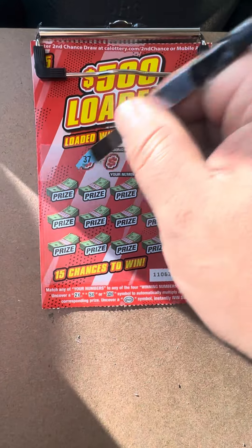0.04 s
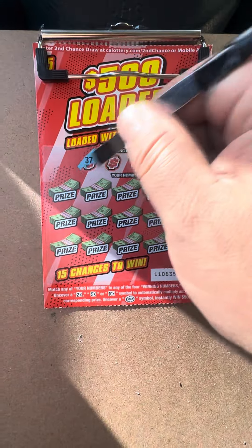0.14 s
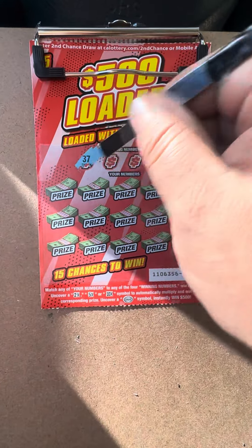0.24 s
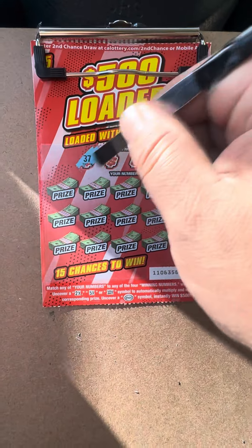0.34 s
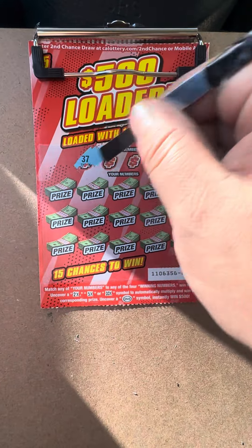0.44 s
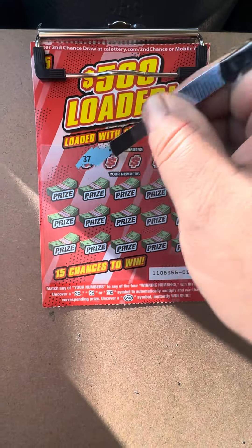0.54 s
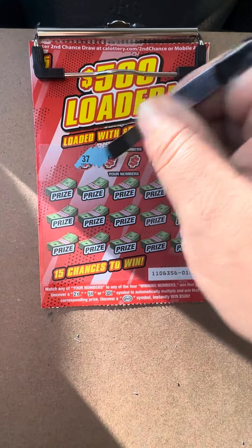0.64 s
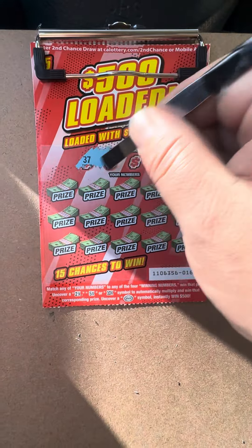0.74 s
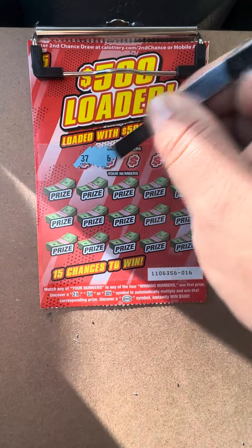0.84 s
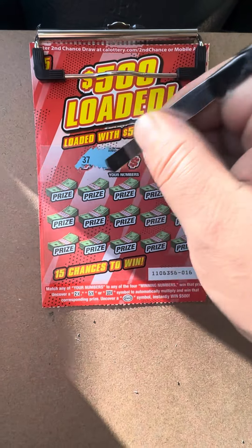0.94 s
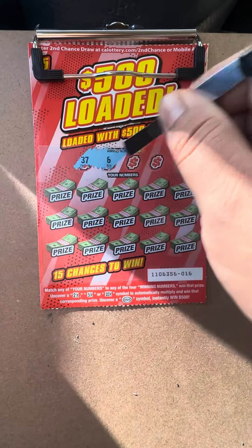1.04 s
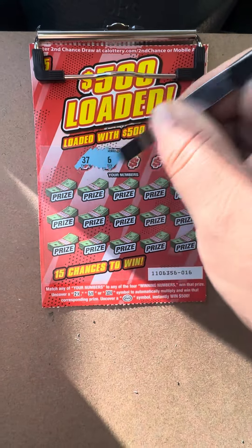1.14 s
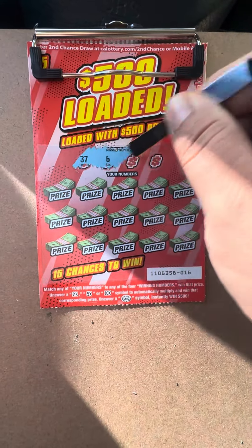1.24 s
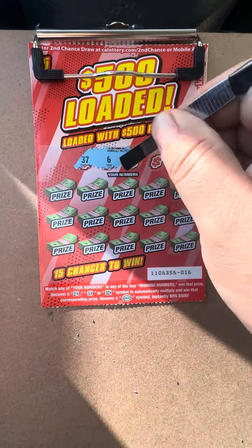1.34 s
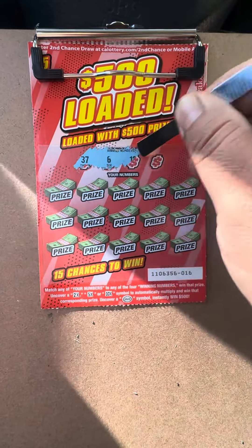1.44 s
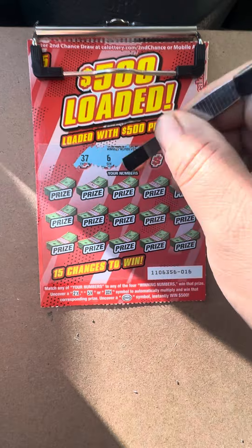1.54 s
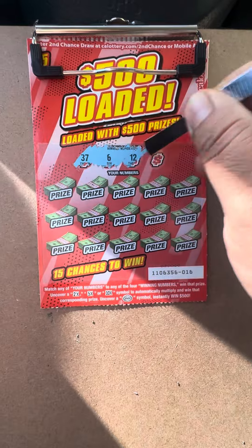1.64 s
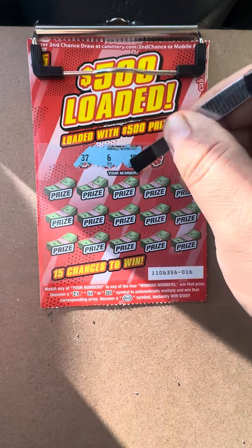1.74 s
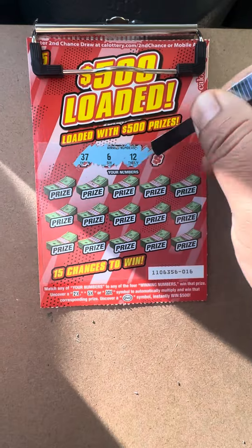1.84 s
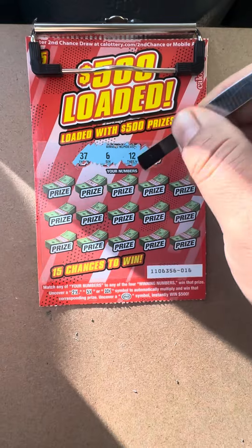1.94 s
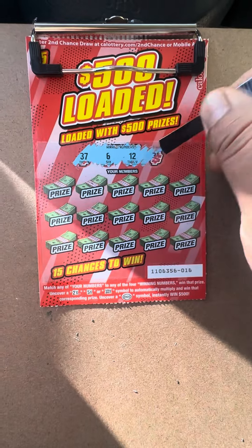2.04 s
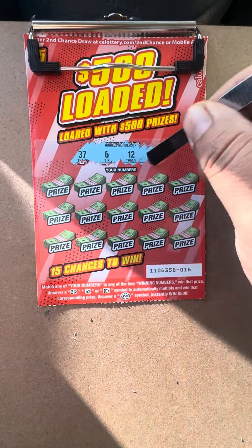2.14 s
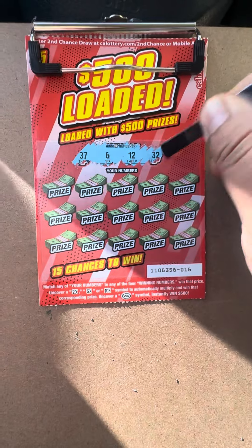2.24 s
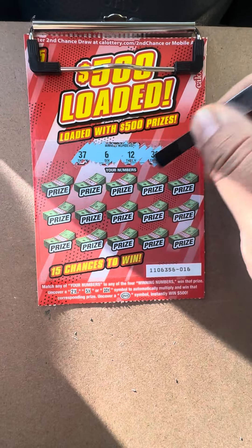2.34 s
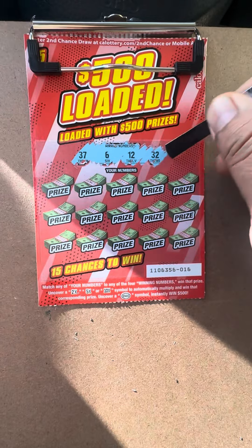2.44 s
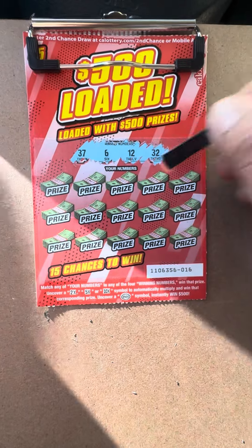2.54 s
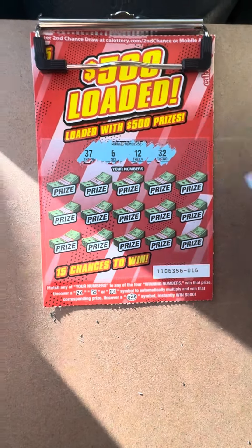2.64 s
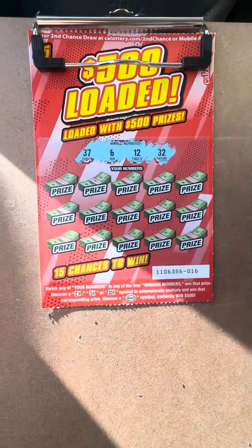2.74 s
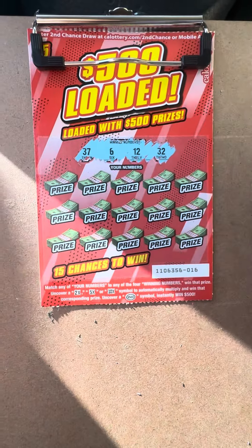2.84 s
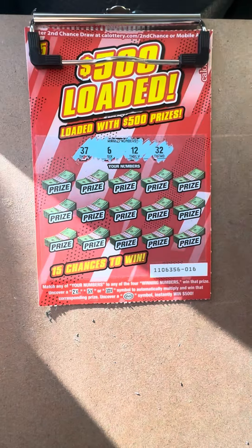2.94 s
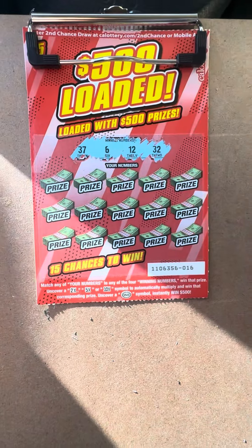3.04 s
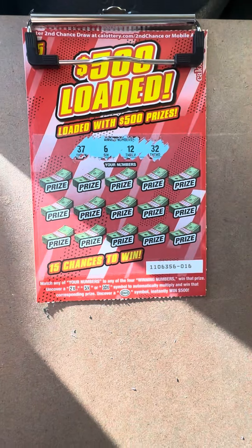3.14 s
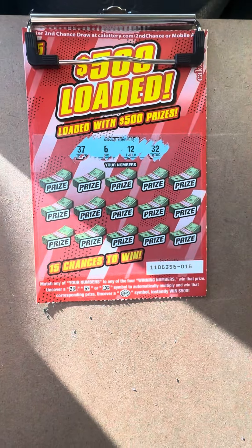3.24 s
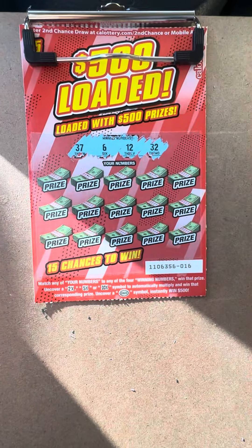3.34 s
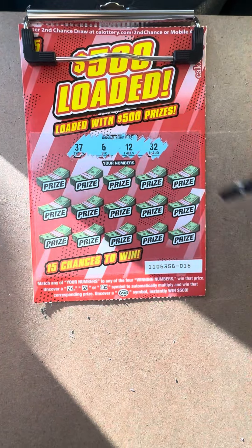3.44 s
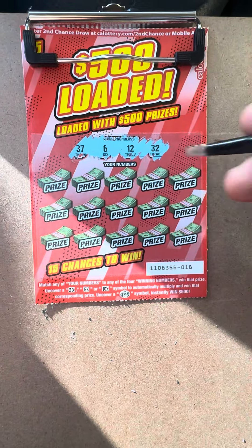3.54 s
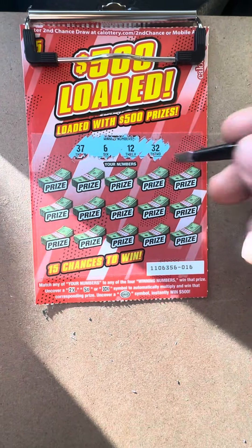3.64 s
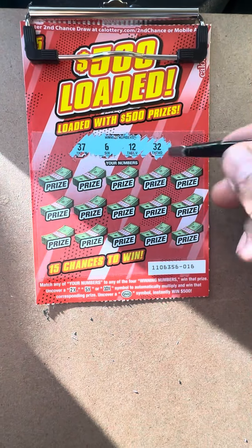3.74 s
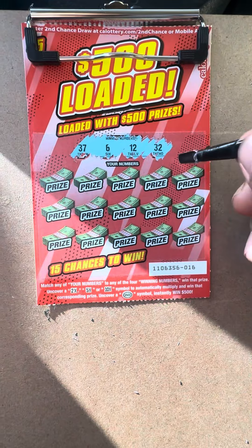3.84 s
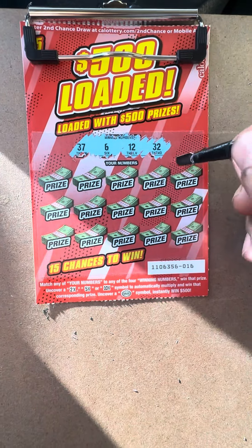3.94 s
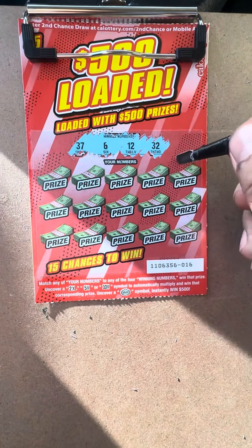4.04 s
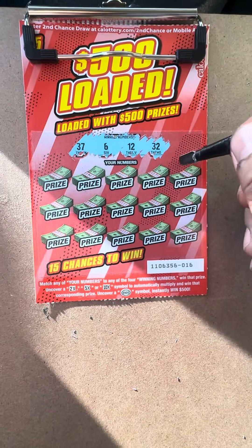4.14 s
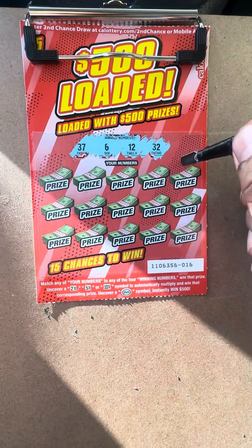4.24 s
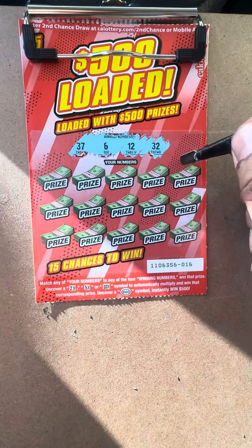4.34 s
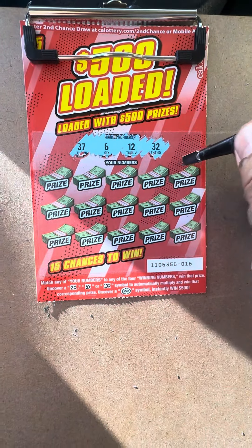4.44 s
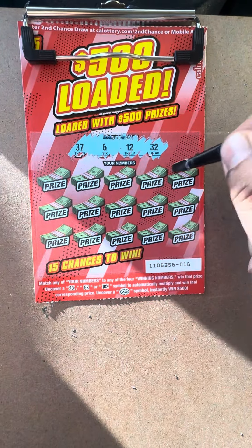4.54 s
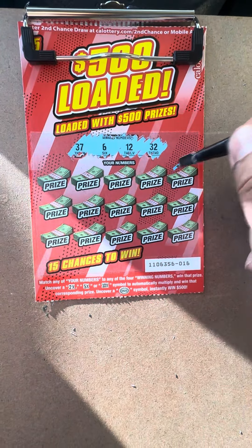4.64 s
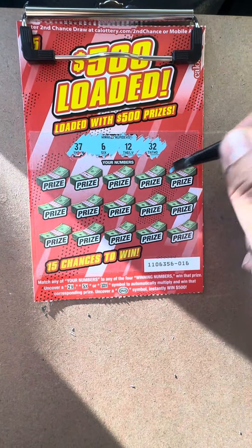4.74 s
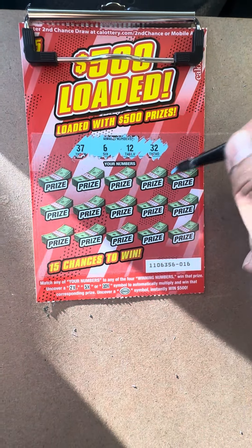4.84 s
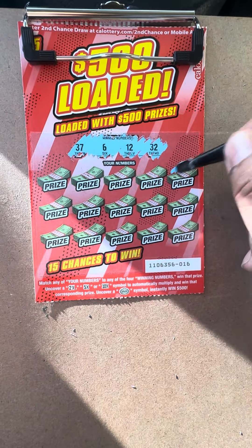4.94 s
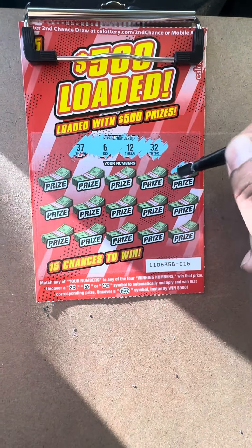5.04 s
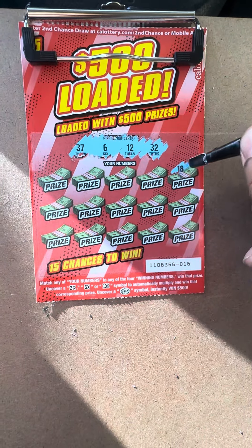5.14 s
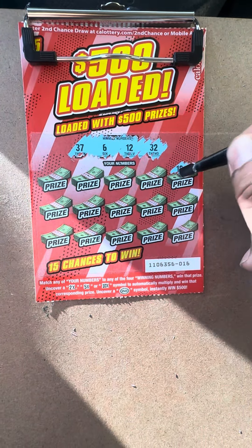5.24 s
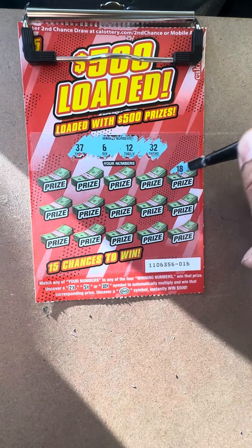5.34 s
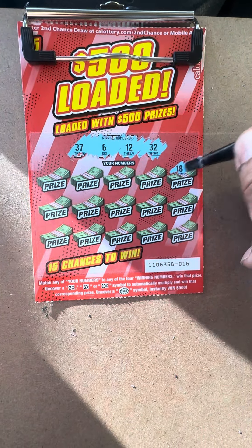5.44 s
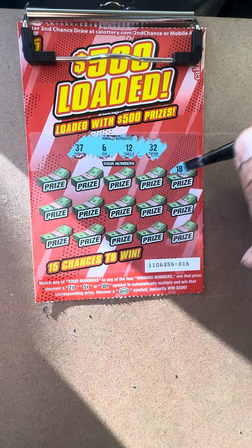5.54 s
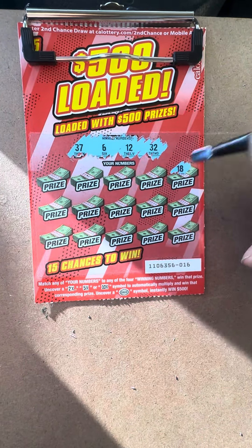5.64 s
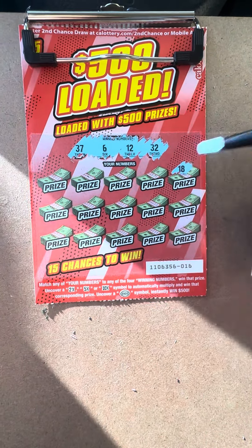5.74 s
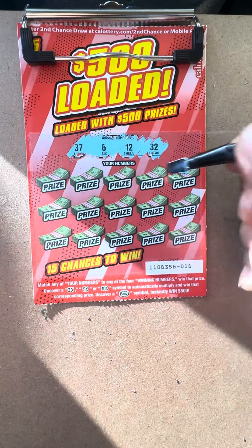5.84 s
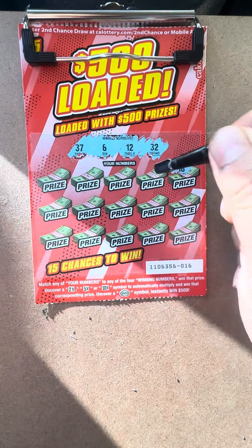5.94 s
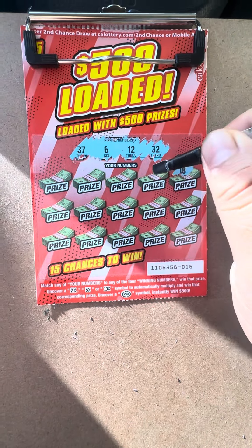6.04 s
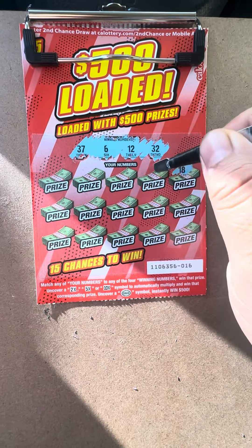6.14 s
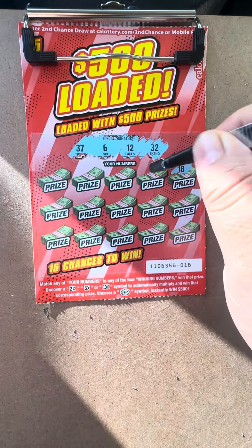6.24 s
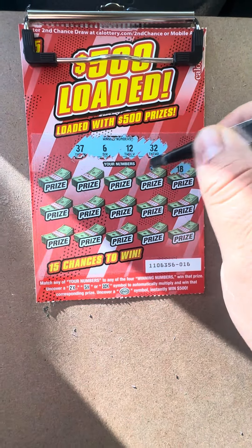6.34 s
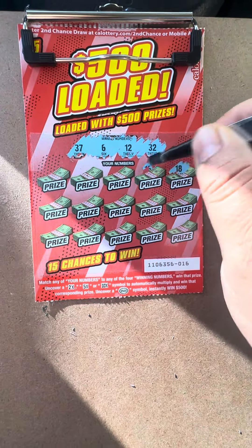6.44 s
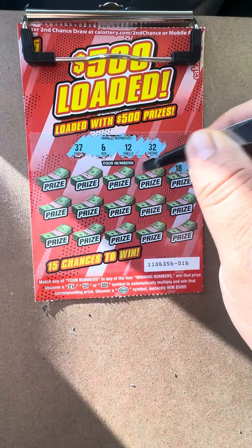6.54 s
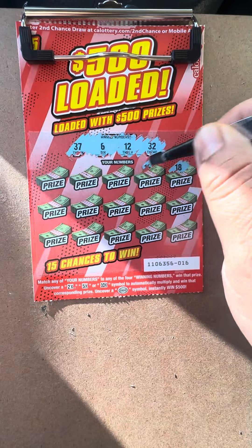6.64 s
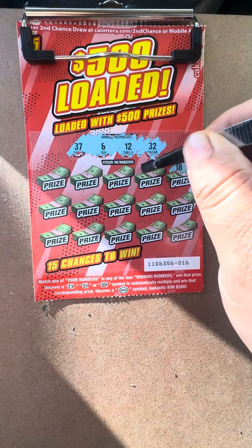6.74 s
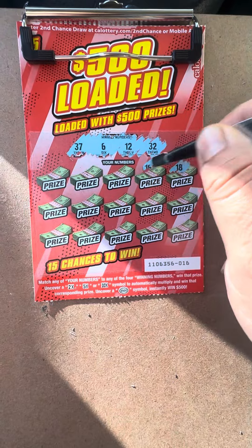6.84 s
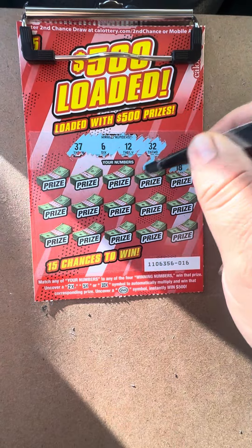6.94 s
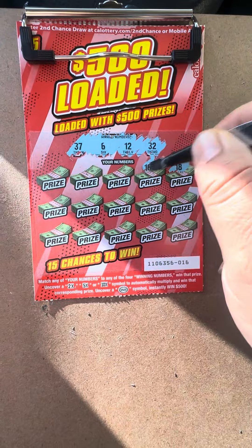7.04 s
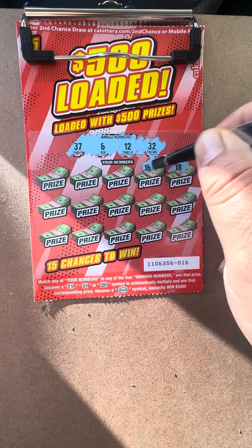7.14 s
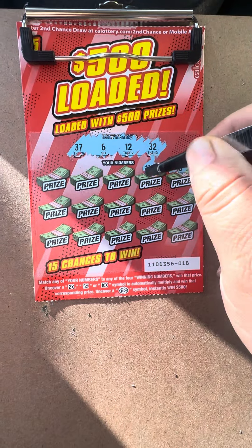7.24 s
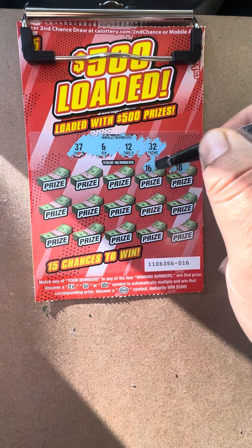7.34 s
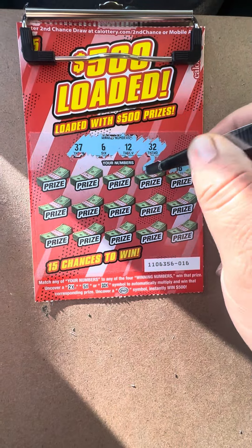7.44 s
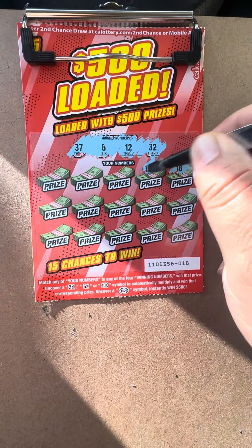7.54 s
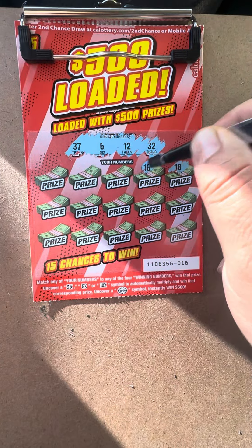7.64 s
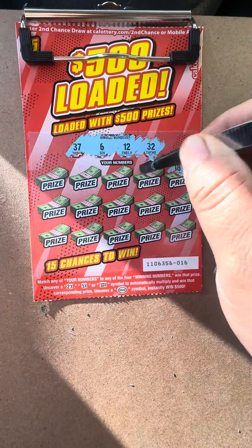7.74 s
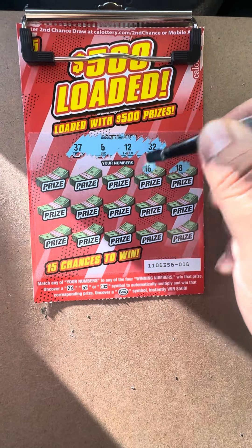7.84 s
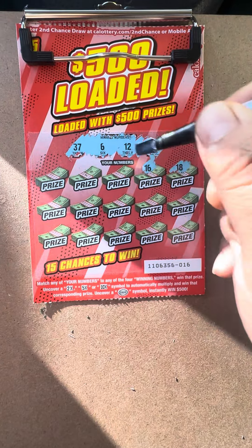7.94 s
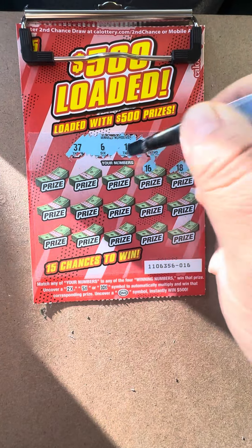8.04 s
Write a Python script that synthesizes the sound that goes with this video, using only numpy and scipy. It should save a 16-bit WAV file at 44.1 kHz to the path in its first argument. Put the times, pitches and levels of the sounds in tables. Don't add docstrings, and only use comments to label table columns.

```python
import sys
import numpy as np
from scipy import signal
from scipy.fft import rfft, irfft, next_fast_len
from scipy.io import wavfile
from scipy.ndimage import uniform_filter1d

SR = 44100
rng = np.random.default_rng(int(sys.argv[2]) if len(sys.argv) > 2 else 0)


def undo_db(level):
    steps = np.asarray(level, float) / 20
    return 10 ** steps


def wav_out(sig):
    wavfile.write(sys.argv[1], SR, np.round(np.clip(np.atleast_2d(sig).T, -1, 1) * 32767).astype(np.int16))


N = 356328


def rms_one(x):
    return x / np.sqrt(np.mean(x ** 2) + 1e-20)


def held(slow):
    return np.repeat(slow, 20, axis=-1)[..., :N]


def drift(rate_hz):
    r = np.exp(-40 * np.pi * rate_hz / SR)
    noise = rng.standard_normal(N // 20 + 2001)
    return rms_one(signal.lfilter([1], [1, -2 * r, r * r], noise)[2000:])


def coloured(spectrum, likeness):
    log_hz = np.log(np.fft.rfftfreq(N, 1 / SR) + 1)
    spectrum_hz, spectrum_db = np.transpose(spectrum)
    alike_hz, alike = np.transpose(likeness)
    level_db = np.interp(log_hz, np.log(spectrum_hz + 1), spectrum_db)
    alike = np.clip(np.interp(log_hz, np.log(alike_hz + 1), alike), -1, 1)
    mid, side = rfft(rng.standard_normal((2, N)))
    both = np.sqrt(1 + alike) * mid + np.sqrt(1 - alike) * side * np.array([[1], [-1]])
    return rms_one(irfft(undo_db(level_db) * both, N))


def swells(starts_s, lengths_s, levels_db, leans_db, sharp, early=1):
    out = np.zeros(N)
    for start_s, length_s, level_db, lean_db in zip(starts_s, lengths_s, levels_db, leans_db):
        i = round(start_s * SR)
        way = np.linspace(0, 1, max(round(length_s * SR), 2))
        arch = np.sin(np.pi * way ** early).clip(0) ** sharp
        out[i:i + len(way)] += arch * undo_db(level_db + lean_db * (way - .5))
    return out


# hz, level_db (per Hz)
ROOM = [(300, -35.5), (500, 4), (750, -1), (1300, -12), (1900, -3), (2500, -12), (3800, -13), (4500, -16),
        (5200, -16.5), (5950, -8), (6800, -17.5), (9000, -29), (10000, -37), (15000, -53)]
# hz, likeness of left and right (-1 to 1)
ROOM_LIKENESS = [(60, 0.46), (180, 0.31), (550, -1.9), (1650, 0.54), (4970, 0.64), (15000, -0.55)]


def room_tone():
    return undo_db(-73.5) * coloured(ROOM, ROOM_LIKENESS)


# time_s, level_db
ARM = [(0.0, -46.5), (0.04, -45), (0.29, -39), (0.47, -50.5), (0.49, -48.5), (2.43, -49), (2.62, -58.5),
       (3.67, -53.5), (4.07, -54), (4.66, -56), (4.7, -45.5), (4.77, -46), (5.87, -63.5), (6.8, -50),
       (7.74, -54.5), (8.08, -64)]


def rumble():
    hum_db, hum_wander_db = -56.5, -0.5
    far_drone_db, far_fade_db_per_s = -51.5, 2.5
    work_drone_db, work_ease_s = -52.5, 0.12
    t = np.arange(N) / SR
    working = np.zeros(N)
    for bout, lift_s in zip((FIRST_BOUT, SECOND_BOUT, THIRD_BOUT), TIP_LIFTS_S):
        inside_s = np.minimum(t - bout[0][0], lift_s - t)
        working += np.clip(inside_s / work_ease_s + .5, 0, 1)
    deep = coloured([(15, -34), (28, -6), (44, 9.5), (62, 6.5), (80, -16.0), (130, -65.5)],
                    [(20, 0.88), (200, 0.96)])
    hum = coloured([(50, -15.0), (70, -3), (92, 1.0), (105, -8.0), (125, -20.5), (200, -74.5)],
                   [(20, 0.5), (200, 0.83)])
    drone = coloured([(100, -36.5), (135, 6.5), (175, -0.5), (260, -5.0), (370, -13.5), (480, -16),
                      (700, -46.5)], [(150, 0.83), (500, 0.18)])
    far = undo_db(far_drone_db - far_fade_db_per_s * t) * (1 - working)
    droning = far + undo_db(work_drone_db) * working
    humming = held(undo_db(hum_db + hum_wander_db * drift(1.8)))
    return undo_db(np.interp(t, *np.transpose(ARM))) * deep + humming * hum + droning * drone


# start_s, length_s, skin_hiss_db, lean_db, dull_board_db
BRUSHES = [(2.505, 0.055, -64.5, 3, -61), (2.555, 0.069, -55.5, 4, -68), (2.825, 0.051, -62.5, -2, -89),
           (2.875, 0.028, -61, 5, -97), (2.994, 0.056, -74, -7, -73), (3.097, 0.03, -72, -2, -75),
           (3.246, 0.028, -69, -8, -81), (3.279, 0.017, -61.5, 11, -89), (3.306, 0.032, -71, -4, -87),
           (3.65, 0.17, -77, -7, -62), (4.075, 0.13, -96, 3, -62.5), (5.565, 0.068, -86, -20, -66),
           (5.636, 0.019, -66, -9, -62), (5.685, 0.16, -65, -25, -81), (5.89, 0.083, -70, 12, -80),
           (7.772, 0.065, -81, -15.5, -58.5), (7.829, 0.072, -68, 14, -74)]
# hz, level_db (per Hz)
SKIN = [(1000, -18), (2400, -11), (3500, -16), (6500, -9.5), (9000, -11), (11000, -20), (13000, -7),
        (15300, -11), (17000, -20)]


def brushing():
    start_s, length_s, hiss_db, lean_db, _ = np.transpose(BRUSHES)
    hiss = coloured(SKIN, [(1000, 0.29), (7000, 0.4), (15000, -0.71)])
    rubs = swells(start_s, length_s, hiss_db, lean_db, sharp=0.47, early=0.83)
    return rubs * held(undo_db(2.5 * drift(150))) * hiss


def struck(times_s, levels_db, modes, contact_s, ring_share, spread_s):
    out = np.zeros(N)
    push = np.hanning(round(contact_s * SR) + 3)
    for hz, mode_db, t60_s in modes:
        clicks = np.full(N, 1e-18)
        at = np.round((times_s + spread_s * np.sqrt(100 / hz)) * SR).astype(int)
        clicks[at] = undo_db(levels_db + mode_db + rng.normal(0, 1.5, len(at)))
        r = undo_db(-60 / (ring_share * t60_s * SR))
        w = 2 * np.pi * hz / SR
        out += signal.lfilter([0, np.sin(w)], [1, -2 * r * np.cos(w), r * r], clicks)
    return signal.lfilter(push / push.sum(), [1], out)


# time_s, tick_db, thud_db
TAPS = [(2.506, -50, -51), (2.584, -49, -58), (3.249, -54, -83), (3.298, -39, -87), (3.544, -58, -65.5),
        (3.596, -75, -53.5), (3.6085, -23, -12.5), (3.982, -34, -53), (3.994, -77, -45.5),
        (4.094, -81, -62), (4.321, -80, -36), (4.395, -79, -41), (4.552, -59, -42), (4.725, -54, -41),
        (4.897, -58, -38), (5.076, -58, -41), (5.096, -39, -56.5), (5.25, -59.5, -45), (5.476, -64, -40),
        (5.548, -59, -61), (5.64, -61, -83), (5.698, -46.5, -67), (6.104, -34.5, -42), (6.11, -87, -45),
        (6.156, -73, -37.5), (6.505, -59, -61), (6.707, -55, -50), (6.765, -57, -40), (6.948, -55, -48),
        (7.162, -51, -57), (7.285, -51, -65), (7.575, -49, -50), (7.74, -66, -52)]
# pitch_hz, level_db, t60_s
THUD = [(140, -3.5, 0.07), (239, -4, 0.08), (295, -17, .05), (382.4, -3, 0.032), (491, 5, 0.024),
        (625, -4.5, 0.04), (760, -5, .03), (924, -14.5, 0.11), (1010, 3.5, 0.02), (1280, -10, 0.033),
        (1690, -14.5, 0.03), (2100, -12.5, 0.025), (2500, -19.5, .02)]
# pitch_hz, level_db, t60_s
TICK = [(2600, -35.5, 0.0034), (4450, -34, 0.0036), (6340, -5, .004), (7100, 4.5, 0.0021), (8890, -2, .004),
        (12500, -11, 0.00207), (16000, -11.5, 0.0015)]


def taps():
    time_s, tick_db, thud_db = np.transpose(TAPS)
    tick = struck(time_s + 0.00032, tick_db, TICK, contact_s=.00007, ring_share=1.8, spread_s=0)
    no_lows = signal.butter(2, 2200, "high", fs=SR, output="sos")
    tick = signal.sosfilt(no_lows, tick)
    thud = struck(time_s + 0.0016, thud_db - 8, THUD, contact_s=0.00025, ring_share=1.0, spread_s=0.00449)
    return (tick + thud) * undo_db([[-1.4], [1.4]])


def rattle():
    time_s, _, thud_db = np.transpose(TAPS)
    blows = np.full(N, 1e-18)
    blows[np.round((time_s + .003) * SR).astype(int)] += undo_db(thud_db - 18.5)
    decay = undo_db(-60 / (.09 * SR))
    return signal.lfilter([1], [1, -decay], blows) * rng.standard_normal(N)


# start_s, scrape_db, lean_db (first to last), extra_bite_db, extra_weight_db
FIRST_BOUT = [(0.011, -34.0, 9.5, -2.5, -1), (0.118, -33, 4, 1.5, 3.5), (0.194, -37, 12.5, 1.0, 1),
              (0.308, -36.5, -20, 3, -2.5), (0.406, -36.5, 2.5, 1.5, -0.5), (0.523, -33.5, -9.5, 1.5, 0.5),
              (0.606, -35.5, 6.5, -2.5, 2.5), (0.707, -33, -8, 1.5, -3), (0.795, -36, 8.5, 3, 2),
              (0.902, -30.5, -2, 0.5, 3), (0.978, -36.5, 24.5, 2, 1), (1.088, -33.5, -17.5, 1.5, 0.0),
              (1.183, -35, 7, 3, 0.5), (1.289, -32.5, -9.5, 2, -1.0), (1.371, -37, 16, 1.5, -1.5),
              (1.481, -31.0, -5, -1, 1.5), (1.566, -35.5, 19, 1.5, 1), (1.672, -34, -7.5, 5, -0.5),
              (1.76, -34.5, 12, -1.5, 1), (1.868, -32.5, 1, 1, 2.5), (1.949, -35.5, 19, -0.5, 3.5),
              (2.057, -32.0, 0, 0.5, 0), (2.135, -39, 23.5, 1, -1), (2.242, -30.5, 7.5, -2, 1),
              (2.317, -37, 4, 1, 0.5), (2.434, -38, -17, 2, -0.5)]
SECOND_BOUT = [(4.391, -43, 0, -9, -0.5), (4.464, -30.0, -8, 1, -1.5), (4.546, -41.0, 3.5, 3, -2),
               (4.638, -33.5, 16, 3, 2), (4.719, -36, 13, -1.5, 0.5), (4.815, -29.5, 9, -1, -0.5),
               (4.891, -36.5, 8.5, 3, 0.5), (4.992, -30, -6, -4.0, -4.5), (5.073, -36.5, 10, -1.5, 2.5),
               (5.169, -32.5, -3.5, -1.5, -0.5), (5.25, -40, 16, 3, -1.5), (5.343, -33.5, 5, 4, -1),
               (5.412, -50.5, 16, -1, 0), (5.49, -42.5, 12, 1.5, 1)]
THIRD_BOUT = [(6.181, -35, -4.5, -3.5, 4.5), (6.247, -42.5, -7, 7.5, 5), (6.336, -32.5, -10.5, 0, -2.5),
              (6.417, -36.5, -9, 0.5, 2.5), (6.504, -33, 6, -3.5, 1), (6.585, -49, 5, -20, 2),
              (6.69, -35.0, 7, 3.5, 1.5), (6.758, -39.5, 17.5, 2.5, 0), (6.854, -31, 3, -1.5, -3),
              (6.938, -39, 7.5, 3, 3.5), (7.029, -35, -0.5, -1, -1), (7.098, -47.5, 13, -12, 1),
              (7.183, -37, 5.5, 5.5, 0), (7.263, -42.5, 22, 5, 1.5), (7.351, -43.5, 11.5, -9, 3.0),
              (7.425, -57.5, 17, -2, -1), (7.517, -46, 21, 6, 1.5), (7.603, -44.5, -13.5, 3.5, -5.5),
              (7.682, -40, 9.5, -8.5, -0.5)]
TIP_LIFTS_S = (2.508, 5.557, 7.759)
# time_s, hiss_re_scrape_db
BITE = [(0, -10), (.6, -8.5), (1.1, -8.5), (1.7, -5.5), (2.05, -8), (2.45, -9.5), (4.4, -19.5),
        (4.7, -13.5), (4.9, -15), (5.25, -11.5), (5.5, -29), (6.2, -19), (6.4, -7), (6.8, -10), (7.1, -11),
        (7.4, -21), (7.7, -7.5)]


def strokes():
    opens_on_return = (True, True, False)
    rest_out_s, rest_back_s = 0.019, 0.019
    out_lag_s = 0.0022
    usual_scrape_db = -33
    thump_out_db, thump_back_db = (-36.5, -34, -32), (-38.5, -38.5, -39.5)
    thump_follows_out, thump_follows_back = 0.48, .45
    bite_back_db, bite_follows = 7, 0.86
    columns = []
    for k, rows in enumerate((FIRST_BOUT, SECOND_BOUT, THIRD_BOUT)):
        start_s, scrape_db, lean_db, more_bite_db, weight_db = np.transpose(rows)
        back = (np.arange(len(rows)) + opens_on_return[k]) % 2
        rest_s = np.where(back, rest_back_s, rest_out_s)
        end_s = np.append(start_s[1:] - rest_s[:-1], TIP_LIFTS_S[k])
        start_s = start_s + out_lag_s * (1 - back)
        extra_db = scrape_db - usual_scrape_db
        out_db = thump_out_db[k] + thump_follows_out * extra_db
        back_db = thump_back_db[k] + thump_follows_back * extra_db
        thump_db = weight_db + np.where(back, back_db, out_db)
        bite_db = more_bite_db + np.interp(start_s, *np.transpose(BITE))
        bite_db = bite_db + bite_back_db * back + bite_follows * extra_db
        columns.append([start_s, end_s - start_s, back, scrape_db, lean_db, thump_db, bite_db])
    return np.hstack(columns)


def knocks():
    catch_back_db = np.array((5, 1.5, -4.5))
    time_s, _, thud_db = np.transpose(TAPS)
    start_s, _, back, scrape_db, *_ = strokes()
    catch_db = scrape_db + back * catch_back_db[np.searchsorted(TIP_LIFTS_S, start_s)]
    catch_db = catch_db + 2.0 + rng.normal(0, 1.9, len(start_s))
    out = np.zeros(N)
    out[np.round((time_s + .002) * SR).astype(int)] = undo_db(thud_db + 3.5)
    out[np.round((start_s + .006) * SR).astype(int)] = undo_db(catch_db)
    return out


# time_s, loss_db, half_length_s
STALLS = [(0.051, 18.5, 0.0055), (0.24, 3.5, .007), (1.026, 4.5, 0.0092), (2.351, 13, 0.0078),
          (4.589, 21, 0.0058), (4.76, 20, 0.011), (5.091, 6.5, 0.0044), (6.53, 13.5, .007),
          (6.703, 16, 0.0079), (6.806, 12, 0.0067), (6.949, 8, 0.004), (7.135, 12, 0.0074),
          (7.295, 9, 0.0087), (7.608, 19, 0.0067), (7.654, 8, 0.016), (7.698, 16, 0.01), (7.727, 14, .005)]


def stalls():
    t = np.arange(N // 20 + 1) * 20 / SR
    dips_db = sum(loss_db * np.exp(-((t - s) / half_s) ** 2) for s, loss_db, half_s in STALLS)
    return held(undo_db(-dips_db))


def grit(per_s, spread_db, judder_db):
    sizes = undo_db(spread_db * np.minimum(rng.exponential(1, N), 4)) * rng.choice([-1, 1], N)
    torn = rng.random(N) < per_s / SR
    return rms_one(sizes * torn * held(undo_db(judder_db * drift(74))))


def tip_state():
    place = np.array((0, 0.84, 0.99))
    t = np.arange(N // 20 + 1) * 20 / SR
    start_s, _, back, *_, bite_db = strokes()
    now = np.clip(np.searchsorted(start_s, t) - 1, 0, None)
    bout = np.minimum(np.searchsorted(np.add(TIP_LIFTS_S, .5), t), 2)
    return place[bout], back[now], bite_db[now]


# pitch_hz, width_hz, left_db, right_db, place_db (change per unit of place),
# return_stroke_db (change)
BOARD = [(89, 45, -4.5, -10.5, 1.8, 0.5), (174.7, 38.3, -6, -5, 4, 5), (251.5, 54, -8, -8.5, 4.5, 2.5),
         (367.7, 57.3, -6, -6.5, 7, 4.5), (485, 74, -5.5, -5.5, 6.5, 3.2), (545.4, 36, -20, -11, 4.5, 5),
         (630.3, 77.4, -9.5, 0, 5, 3)]
TICKET = [(748, 43, -28.5, -18, 10, 6.5), (893, 64, -11, -4, -1.5, -0.5), (988, 50, -9, -5.5, 0.5, 4),
          (1073, 90, -3.5, -1.5, -3, -3), (1230, 98, -14, -20, 5.5, 7), (1366, 133, -3.5, -15, 0.5, -4),
          (1611, 140, -9, -8.5, 4.5, 0), (1950, 190, -20.5, -25.5, 9.5, -4),
          (2292, 152, -3, -2.5, -0.5, 0.1), (2605, 110, -9.5, -9.5, -3, 3),
          (2836, 130, -13, -13, -2.5, 2.5), (3177, 260, -24, -17, 4, 0)]
COATING = [(3566, 360, -21.5, -25, -6, 7.8), (4150, 460, -23.5, -23.5, 0.5, 7.4),
           (5000, 260, -20, -21.5, -5, 3.4), (5605, 520, -24.5, -24.5, -3, 7.7),
           (6530, 1000, -20.5, -19.5, -10.5, 7.7), (6636, 850, -20.5, -21.5, -8, 6.2),
           (7330, 1100, -25.5, -25.5, -2, 6.1), (8680, 500, -31, -33, -5.5, 2),
           (9210, 430, -27, -31, -3.5, 5), (10360, 650, -40.5, -37.5, -1, 8.6),
           (15300, 3000, -36.5, -37, -1, 4)]
LEFT_LEAD = [0.1, -0.0, 0.0, -0.1, -0.5, -0.4, -0.6, 1.5, -1.2, 1.3, 0.9, 1.7, 0.2, 0.2, -0.5, -0.8, -0.0,
             0.4, 0.3, 0.1, 0.2, 0.9, -0.3, -0.7, -0.9, -1.6, -1.6, -1.6, -2.9, 2.2]


def board(force, low_hz, high_hz, wander_db, dulling=0):
    sway_rad = 0.22
    edge, back, bright_db = tip_state()
    out, power = 0, 0
    for k, (hz, width_hz, left_db, right_db, place_db, back_db) in enumerate(BOARD + TICKET + COATING):
        if not low_hz <= hz < high_hz:
            continue
        r = np.exp(-4.9 * width_hz / SR)
        pole = r * np.exp(2j * np.pi * hz / SR)
        tilt_db = dulling * (bright_db + 3.5) * np.log2(hz / 1400)
        drive = undo_db(edge * place_db + back * back_db + tilt_db)
        sliding = undo_db(wander_db * drift(7.9))
        push = force * held(drive * sliding) + 1e-18
        rings = signal.lfilter([(-1) ** k * (1 - r) ** 2], [1, -2 * pole, pole ** 2], push)
        lead_rad = LEFT_LEAD[k] + sway_rad * (min(hz / 700, 1) + hz / 3000) * drift(10)
        ports = undo_db([[left_db], [right_db]]) * np.exp(.5j * lead_rad * np.array([[1], [-1]]))
        out = out + held(ports.real) * rings.imag + held(ports.imag) * rings.real
        power = power + drive ** 2 * np.mean(np.abs(ports) ** 2) * (1 - r) / 8
    return out / held(np.sqrt(uniform_filter1d(power, size=30)))


def scraping():
    hiss_lag_out_s, hiss_lag_back_s = (0.0064, .005, .005), (0.0048, 0.0069, .008)
    hiss_quits_s = 0.0027
    start_s, length_s, back, scrape_db, lean_db, thump_db, hiss_db = strokes()
    bout = np.searchsorted(TIP_LIFTS_S, start_s)
    lag_s = np.where(back, np.take(hiss_lag_back_s, bout), np.take(hiss_lag_out_s, bout))
    grip = stalls() * held(undo_db(1.3 * drift(90)))

    rub_start_s, rub_length_s, _, rub_lean_db, dull_db = np.transpose(BRUSHES)
    dull = swells(rub_start_s, rub_length_s, dull_db, rub_lean_db, sharp=0.27)
    thump = swells(start_s - .003, length_s + 0.0049, thump_db, 0.77 * lean_db, sharp=0.45) + dull
    scrape = swells(start_s, length_s, scrape_db - 1.5, lean_db, sharp=0.76, early=0.9) * grip
    scrape = scrape + undo_db(-12.5) * dull
    hiss = swells(start_s + lag_s, length_s - lag_s - hiss_quits_s, scrape_db + hiss_db - 1.5,
                  1.24 * lean_db, sharp=0.87) * grip
    hiss = hiss + undo_db(-20.5) * scrape

    shake = rattle()
    low = thump * grit(per_s=650, spread_db=3.5, judder_db=0.5) + undo_db(8.0) * shake
    middle = scrape * grit(per_s=4000, spread_db=2.5, judder_db=1.5) + undo_db(-8.5) * shake + knocks()
    high = hiss * grit(per_s=10000, spread_db=1.0, judder_db=0.0) + undo_db(-16.5) * shake
    shaking = board(low, 0, 700, wander_db=-2.0)
    ringing = board(middle, 700, 3400, wander_db=1.5, dulling=0.27)
    hissing = board(high, 3400, SR, wander_db=2.0)
    return shaking + ringing + hissing


def walls(x, t60_s, after_s):
    t = np.arange(round(1.5 * t60_s * SR)) / SR
    wash = signal.lfilter([1], [1, -.4], rng.standard_normal((2, len(t))))
    wash = wash * undo_db(-60 * t / t60_s) * (t > after_s)
    return signal.oaconvolve(x, wash / np.sqrt(np.sum(wash ** 2) / 2), axes=1)[:, :N]


def scene():
    background = room_tone() + rumble()
    near = brushing() + taps() + scraping()
    short_waves = signal.butter(1, 900, "high", fs=SR, output="sos")
    bright = signal.sosfilt(short_waves, near)
    scattered = undo_db(-9.0) * walls(bright, t60_s=.03, after_s=0.00044)
    washed = undo_db(-15) * walls(bright, t60_s=0.082, after_s=0.0023)
    return near + scattered + washed + background


def low_pass(x):
    return signal.sosfilt(signal.butter(12, 16750, fs=SR, output="sos"), x)


def record(dry):
    dip = signal.butter(1, [10000, 14500], "bandstop", fs=SR, output="sos")
    left, right = signal.sosfilt(dip, dry) + undo_db(-27.5) * dry
    mid, side = (left + right) / 2, (left - right) / 2
    size = next_fast_len(N)
    hz = np.fft.rfftfreq(size, 1 / SR)
    shared_lows = (.3 * 250 ** 2 + hz ** 2) / (hz ** 2 + 250 ** 2)
    side = irfft(rfft(side, size) * shared_lows, size)[:N]
    return low_pass(np.array([mid + side, mid - side]))


dry = scene()
out = record(dry)
wav_out(out)
```